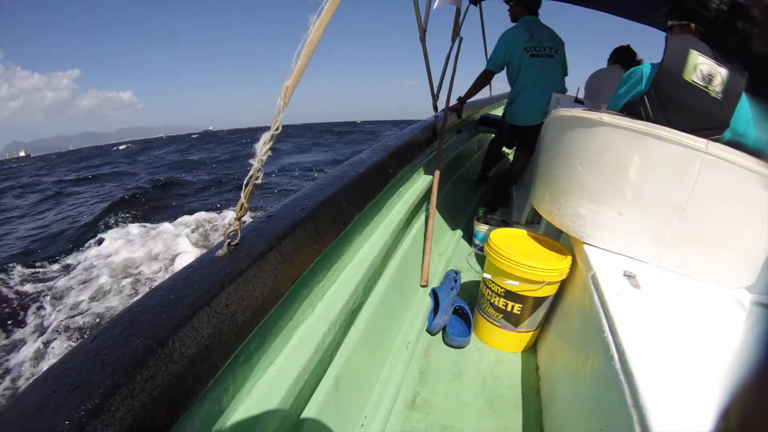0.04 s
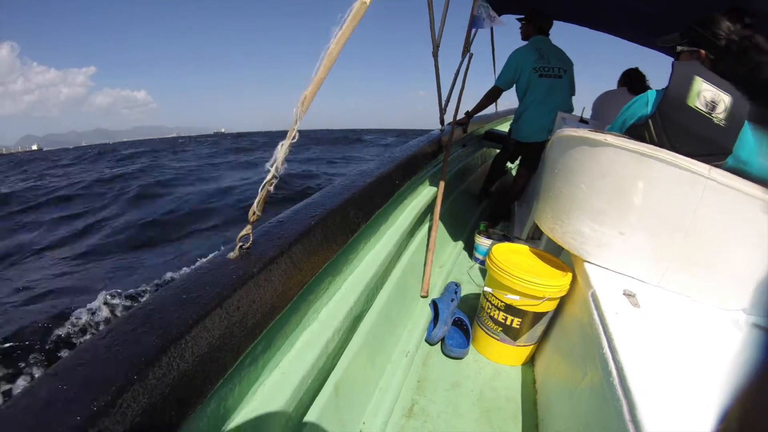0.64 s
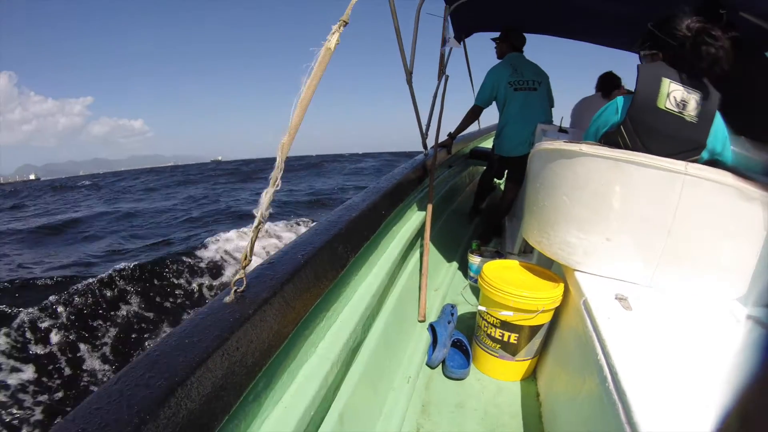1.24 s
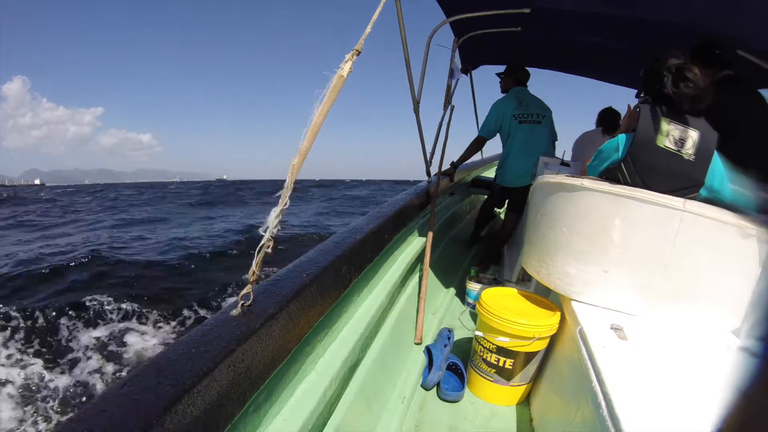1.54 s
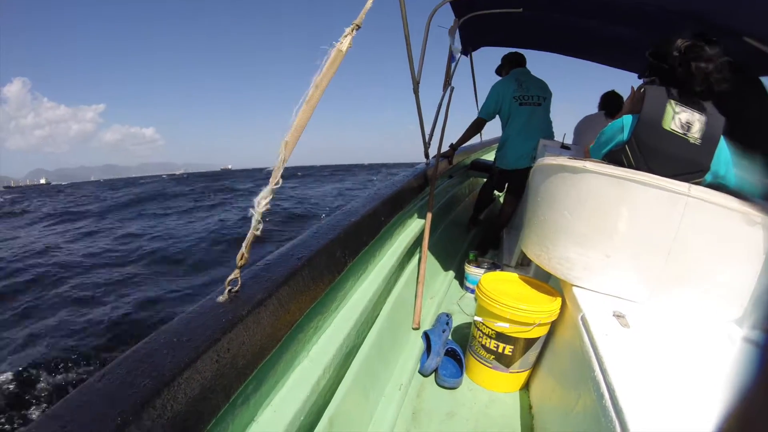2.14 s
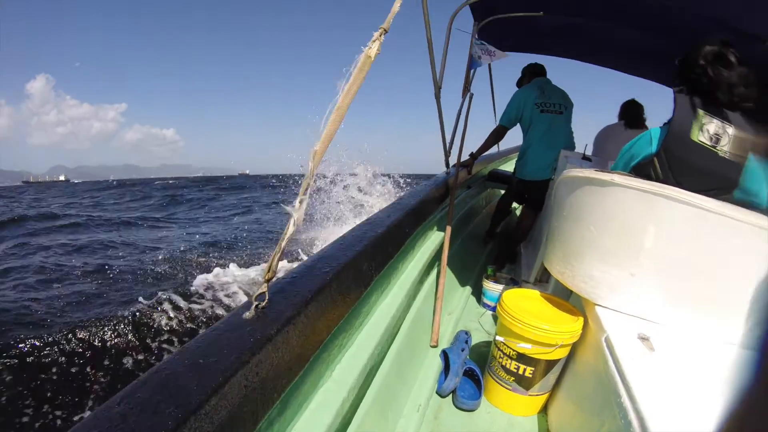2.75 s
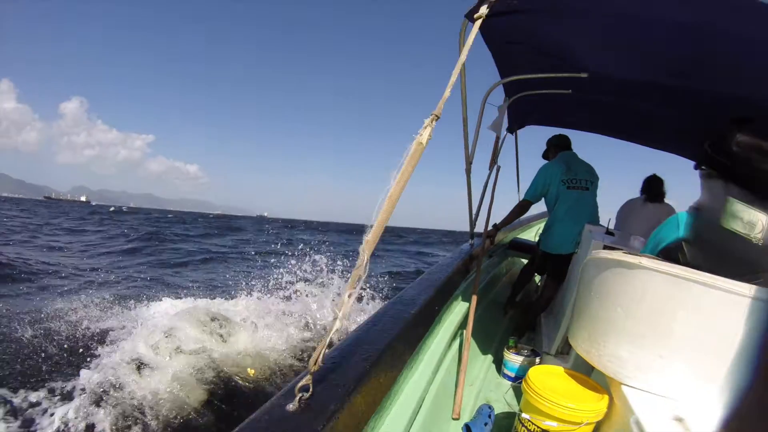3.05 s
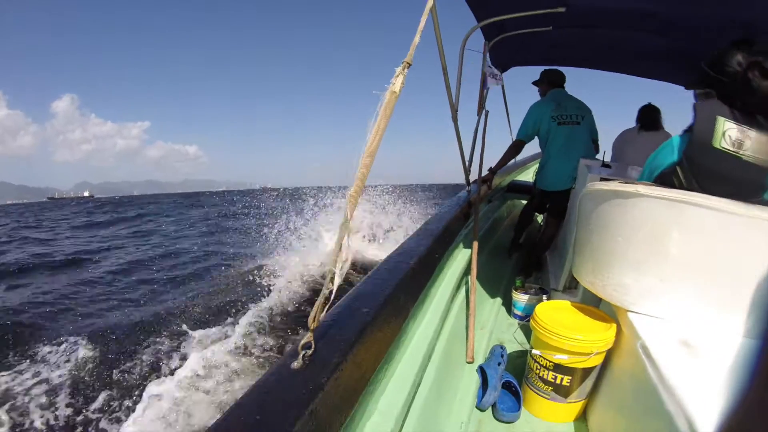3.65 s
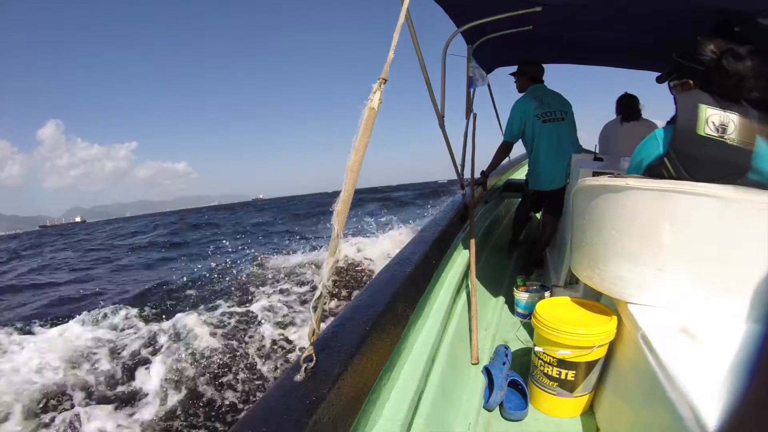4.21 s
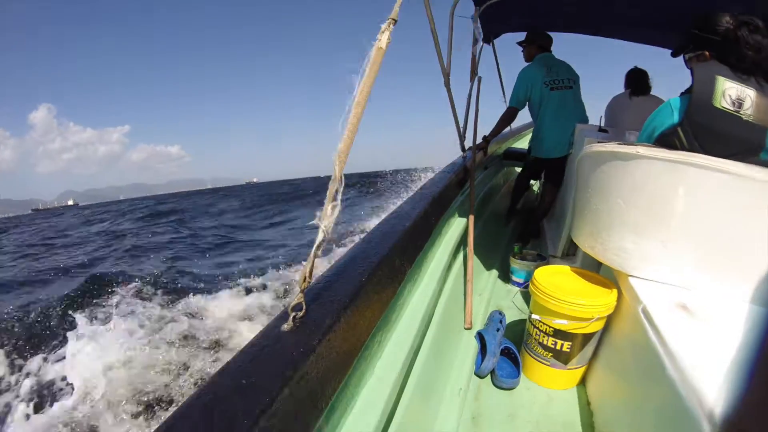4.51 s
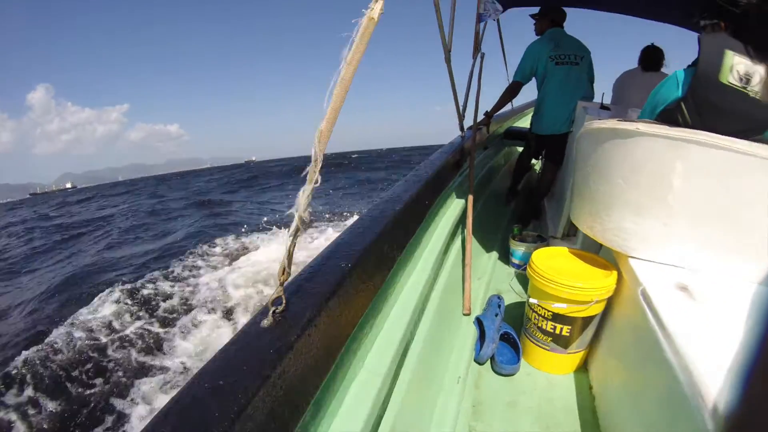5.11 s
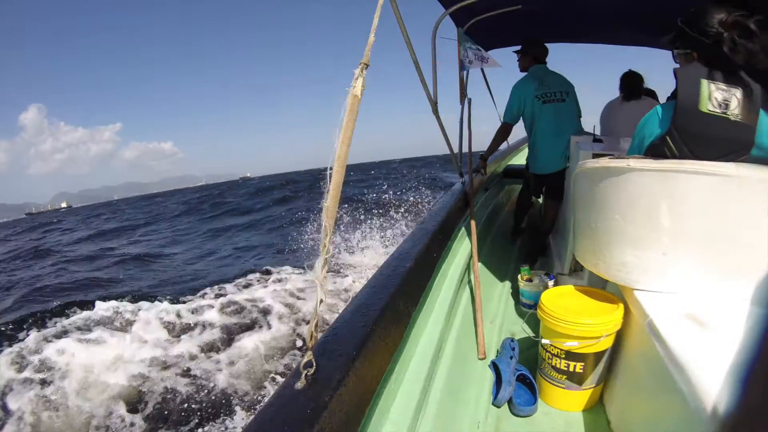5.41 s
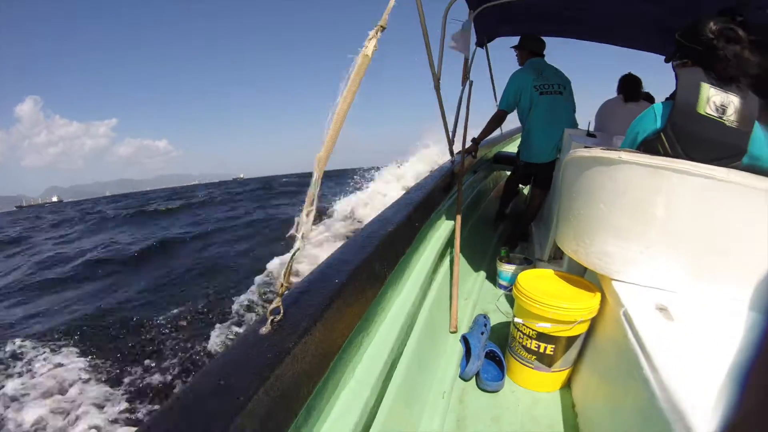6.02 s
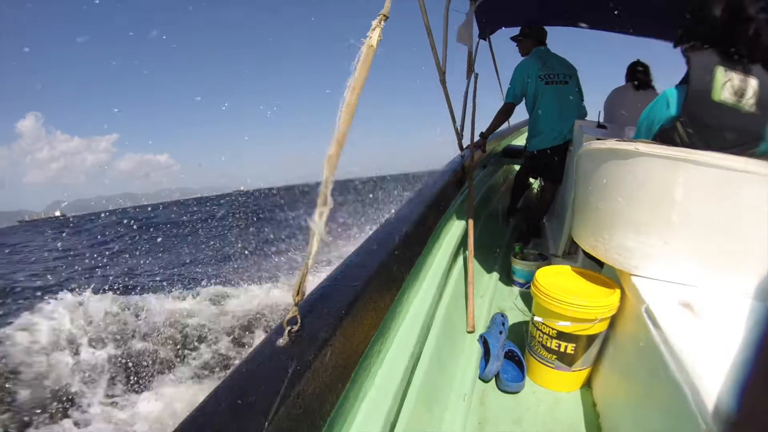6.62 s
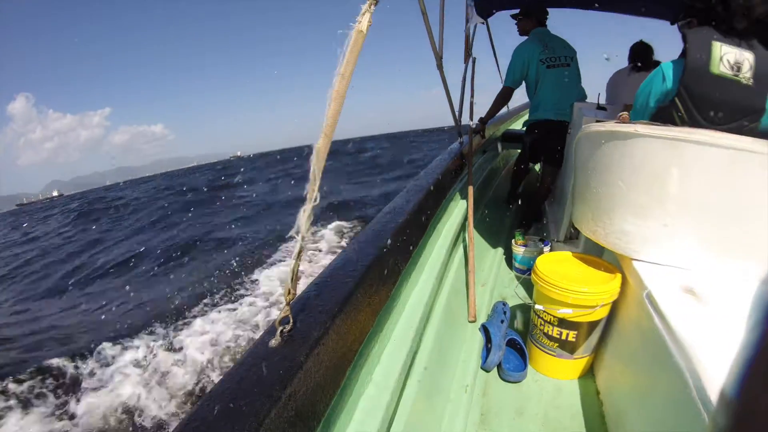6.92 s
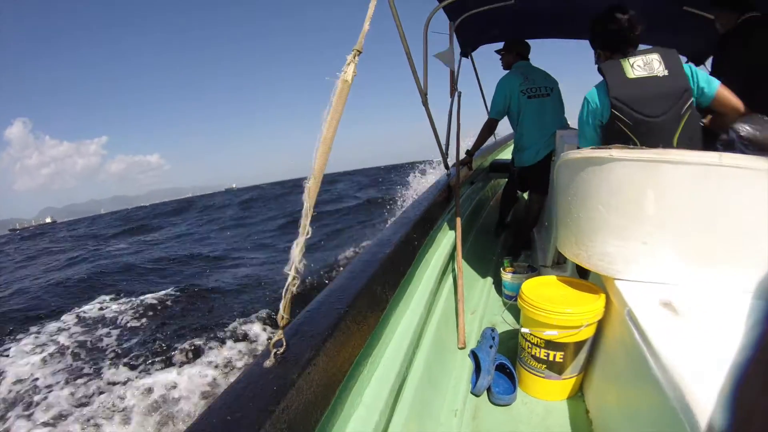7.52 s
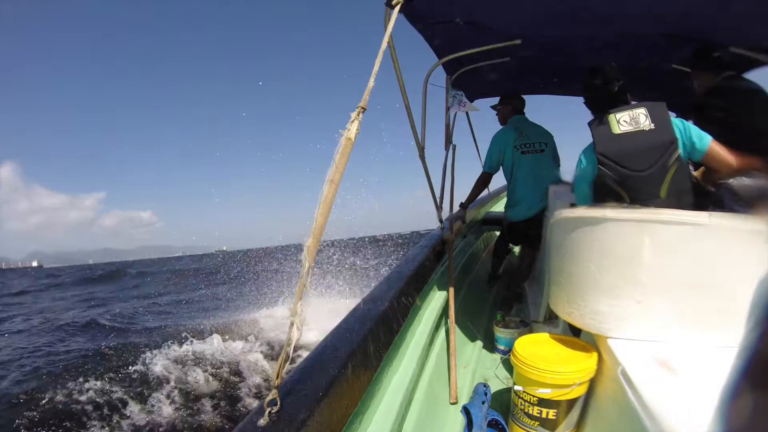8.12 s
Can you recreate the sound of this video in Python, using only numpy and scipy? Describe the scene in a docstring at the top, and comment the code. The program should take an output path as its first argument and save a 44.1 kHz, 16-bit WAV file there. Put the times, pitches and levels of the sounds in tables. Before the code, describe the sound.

An outboard motor drones steadily, wavering a little, as an open boat pushes through choppy sea. Water rushes and fizzes off the bow in repeated surges, waves drum and thump on the hull, and wind rumbles low. Late on, spray hits the waterproof camera housing near the boat's edge in a bunch of loud, sharp cracks, followed by a lighter patter at the very end.

```python
"""A four-stroke outboard motor drones as it pushes an open boat through choppy sea.
Its firing cylinders make the note, which sags as the hull meets waves. Water rushes and fizzes off
the bow, the chop drums on the hull, and wind rumbles. All is heard from a camera in a waterproof
housing near the boat's edge. Late on, spray comes aboard twice and drops crack on the housing itself."""
import sys
import numpy as np
from scipy import signal
from scipy.fft import rfft, irfft
from scipy.io import wavfile

SR = 44100
rng = np.random.default_rng(int(sys.argv[2]) if len(sys.argv) > 2 else 0)


def materialize(psi):
    """Save the field psi as 16-bit PCM at rate SR to the path in sys.argv[1].

    A 1-D psi becomes a single channel; in a 2-D psi each row is a channel.
    """
    bounded = np.clip(np.atleast_2d(psi).T, -1, 1)
    quanta = np.round(bounded * 32767).astype(np.int16)
    wavfile.write(sys.argv[1], SR, quanta)


N = 368676
TIME = np.arange(N) / SR


def gain(db):
    """Turn decibels into a number to multiply by."""
    return 10 ** (np.asarray(db) / 20)


def unit(x):
    """Scale a signal so that its average strength (rms) is 1."""
    return x / np.sqrt(np.mean(x ** 2))


def curve(table):
    """Join rows of (time, value) with straight lines."""
    return np.interp(TIME, *np.transpose(table))


def swells(table, column=2):
    """Smooth rises and dips in dB; each row begins with its middle and half its length in seconds."""
    return sum(row[column] * np.exp(-((TIME - row[0]) / row[1]) ** 2) for row in table)


def burst(start, rise):
    """A loudness shape that peaks at 1, rise seconds after the start, then dies away."""
    age = np.maximum(TIME - start, 0) / rise
    return age * np.exp(1 - age)


def surge(crest, rise, fall_s):
    """A loudness shape that climbs smoothly to 1 at the crest, then falls to 37% in fall_s."""
    climb = np.clip(1 + (TIME - crest) / rise, 0, 1)
    return np.sin(np.pi / 2 * climb) ** 2 * np.exp(-np.maximum(TIME - crest, 0) / fall_s)


def wander(rate):
    """A smooth random wobble of strength 1 that changes about rate times a second."""
    hz = np.arange(N // 2 + 1) * SR / N
    return unit(irfft(rfft(rng.standard_normal(N)) / (1 + (hz / rate) ** 2), N))


def patter(per_second, spread_db):
    """Tiny hits at random times, many small and a few large."""
    sizes = gain(spread_db * np.minimum(rng.exponential(size=N), 5))
    hits = rng.random(N) < per_second / SR
    return unit(hits * sizes * rng.choice([-1, 1], N))


# Pitches the housing boosts or weakens. Each row: pitch in Hz, width in Hz, boost in dB.
HOUSING_TONE = [(1550, 70, 3), (1800, 66, 2), (1870, 40, -4.5), (2190, 350, 5.5), (2730, 890, 5),
                (3220, 120, -4.5), (3490, 240, 4), (5305, 540, 6), (5893, 730, 10.5), (6430, 300, -3.5),
                (7020, 330, 3), (8930, 550, 3.5), (10600, 560, 4), (14800, 1500, -3.5)]

def colour(x, tone):
    """Shape a noise with rows of (Hz, dB) and with the housing's own tone; the result has strength 1."""
    hz = np.arange(1, N // 2 + 2) * SR / N
    tone_hz, tone_db = np.transpose(tone)
    db = np.interp(np.log(hz), np.log(tone_hz), tone_db)
    housing_db = sum(boost / (1 + (2 * (hz - centre) / width) ** 2) for centre, width, boost in HOUSING_TONE)
    return unit(irfft(rfft(x) * gain(db + housing_db), N))


# How fast the engine runs. Each row: time in seconds, engine cycles per second.
ENGINE_SPEED = [(0.0, 40.7), (0.54, 40.52), (0.67, 41.09), (1.37, 41.32), (2.05, 40.21), (2.4, 40.83),
                (3.73, 41.05), (3.96, 40.43), (4.21, 41.35), (5.21, 40.03), (5.45, 40.75), (5.54, 40.05),
                (5.91, 41.03), (6.66, 38.96), (7.47, 41.24), (7.77, 40.52), (7.99, 39.3), (8.36, 39.4)]
# The tones of the drone. Each row: multiple of the engine speed, level in dB.
# Tones 4 (the firing note) and 8 (its octave) get their levels in the function instead.
DRONE_TONES = [(1, -7.5), (2, -9), (3, -10), (4, 0), (5, -14), (6, -5.5), (7, -10), (8, -1.5), (9, -12.5),
               (10, -9), (11, -22), (12, -29.5), (13, -19), (14, -14.5), (15, -27.5), (16, -22),
               (17, -15.5), (18, -21.5), (19, -25), (20, -25), (21, -19), (22, -31), (23, -28), (24, -24),
               (25, -31.5), (26, -22.5)]
# The whine of the gears. Each row: multiple of the engine speed, level in dB.
GEAR_TONES = [(39, -11), (40, -19), (43, -14.5), (50, -16.5), (53, -18), (55, -16)]
# The back of the boat bobs: down, water muffles the exhaust; up, the firing note opens. Each row:
# middle in seconds, half length in seconds, change of the firing note in dB, change of its octave in dB.
STERN_BOBS = [(.25, 0.21, -10, 0.5), (.67, .16, 6.5, -1), (2.13, 0.14, -12, 0.5), (2.9, 0.079, 3.5, 1),
              (3.83, .14, -4, -0.5), (4.2, .1, 3, -0.5), (5.45, 0.056, 4, 1.5), (5.69, .1, -12, -1),
              (6.48, 0.16, -2, -9), (6.6, .09, 7, 2), (7.03, .11, -12, 2.5), (7.32, 0.099, 4, -1)]
# The tone of the valve clatter. Each row: pitch in Hz, level in dB.
CLATTER_TONE = [(400, -6), (650, -2), (1000, -9), (1600, -3.5), (2400, -6), (3400, -15.5), (5000, -25),
                (12000, -39)]

def outboard(cruise_hz=40.6, drone_db=-46, whine_db=-46.5, clatter_db=-48, waver_db=1.77, throb=0.28):
    """Four cylinders fire in each cycle; the gears whine and the valves clatter in step with them."""
    speed = curve(ENGINE_SPEED)
    phase = 2 * np.pi * np.cumsum(speed * (1 + 0.0015 * wander(12.3))) / SR
    # The firing note grows with speed; its octave sinks when the engine struggles.
    extra_hz = speed - cruise_hz
    firing_db = -45 + 1.3 * extra_hz + swells(STERN_BOBS)
    octave_db = -44 + 2.5 * np.minimum(extra_hz, 0) + swells(STERN_BOBS, column=3)
    exhaust_db = {4: firing_db, 8: octave_db}
    drone = 0
    for tones, base_db in (DRONE_TONES, drone_db), (GEAR_TONES, whine_db):
        for multiple, db in tones:
            level_db = exhaust_db.get(multiple, base_db + db + waver_db * wander(1.8))
            tone = np.sqrt(2) * np.sin(multiple * phase + rng.uniform(0, 2 * np.pi))
            drone += gain(level_db) * tone
    strokes = (1 + throb * np.cos(phase)) * (1 + 0.19 * np.cos(4 * phase))
    clatter = colour(strokes * rng.standard_normal(N), CLATTER_TONE)
    return drone + gain(clatter_db) * clatter


# The steady rush of water along the side. Each row: time in seconds, level in dB.
SIDE_RUSH = [(0, -45.5), (1.6, -48), (2.7, -47), (4.5, -44.5), (7.4, -44), (8.36, -43.5)]
# Waves the bow throws aside. Each row: peak time in seconds, rise in seconds, wash in dB, fizz in dB.
BOW_WAVES = [(.22, 0.17, -45.5, -60), (1.02, 0.19, -48, -58), (1.75, .12, -46, -54),
             (2.35, 0.22, -45.5, -58), (2.97, 0.26, -41, -49.5), (3.17, 0.2, -41.5, -46.5),
             (3.48, .12, -44.5, -51.5), (3.82, 0.26, -42.5, -49.5), (4.07, 0.39, -43, -46),
             (4.78, 0.17, -44.5, -60), (5.75, 0.3, -44, -46.5), (6.15, 0.17, -47, -54.5),
             (6.7, 0.23, -39, -43.5), (6.87, 0.14, -66, -54), (7.3, 0.15, -46, -57), (8.0, .2, -48, -50.5),
             (8.3, 0.35, -50, -48)]
# Small waves slap the side. Each row: start in seconds, rise in seconds, wash in dB, fizz in dB.
SIDE_SLAPS = [(.155, .045, -52, -68), (1.338, 0.0085, -47, -55), (2.499, 0.0051, -49, -67),
              (2.522, 0.0085, -45, -53), (2.655, 0.0062, -52, -70), (5.272, 0.0034, -45, -63),
              (5.325, 0.012, -46.5, -75)]
# The tones of the rushing wash and the brighter fizz. Each row: pitch in Hz, level in dB.
WASH_TONE = [(300, -6), (600, -8.5), (1000, -7.5), (1400, -4), (2300, -1.5), (3000, -6), (4000, -9),
             (4700, -20), (7000, -21), (15000, -41.5)]
FIZZ_TONE = [(1000, -34), (2500, -6.5), (3800, 2.5), (4700, -3.5), (6500, 1), (9000, -8), (12000, -18.5),
             (15500, -18)]

def bow_wash(steady_fizz_db=-14, wave_fizz_db=-1, churn_db=0.72):
    """Torn water rushes, surges and slaps along the side; its spray falls back as a fizz of droplets."""
    wash_level = gain(curve(SIDE_RUSH))
    fizz_level = wash_level * gain(steady_fizz_db)
    for crest, rise, wash_db, fizz_db in BOW_WAVES:
        wash_level = np.hypot(wash_level, gain(wash_db) * surge(crest, rise, fall_s=0.27))
        fizz_level = np.hypot(fizz_level, gain(fizz_db + wave_fizz_db) * surge(crest, rise, fall_s=0.32))
    for start, rise, wash_db, fizz_db in SIDE_SLAPS:
        slap = burst(start, rise)
        wash_level += gain(wash_db) * slap
        fizz_level += gain(fizz_db) * slap
    wash = wash_level * colour(patter(per_second=9000, spread_db=2.2), WASH_TONE)
    fizz = fizz_level * colour(patter(per_second=9000, spread_db=2.5), FIZZ_TONE)
    return (wash + fizz) * gain(churn_db * wander(31))


# The bow comes down on a wave. Each row: start in seconds, ring in dB, rumble in dB.
HULL_THUMPS = [(1.13, -37, -49), (1.98, -46, -46), (2.325, -35, -58), (2.521, -36, -48), (3.12, -34, -49),
               (3.43, -35, -48), (3.87, -50, -49), (5.441, -39, -54), (5.6, -41, -51), (6.53, -46, -43),
               (6.885, -31, -62), (7.86, -46, -48)]
# The low notes the hull rings with. Each row: pitch in Hz, seconds to fade by 60 dB, level in dB.
HULL_NOTES = [(52, 0.084, -4), (85.5, 0.13, 3.5), (121, 0.09, 6.5)]
# The tone of the drumming on the hull. Each row: pitch in Hz, level in dB.
HULL_TONE = [(40, -4.5), (80, 1.5), (130, 1), (210, 2.5), (350, -2), (470, -9), (800, -30), (2000, -49)]

def hull(drumming_db=-47.5, uneven_db=1.2, rumble_rise_s=0.02):
    """Small waves drum unevenly on the open hull; bigger ones thump it, so it rings and rumbles."""
    drum_level = gain(drumming_db + uneven_db * wander(3.5))
    rings = 0
    for start, ring_db, rumble_db in HULL_THUMPS:
        drum_level += gain(rumble_db) * burst(start, rumble_rise_s)
        age = np.maximum(TIME - start, 0)
        for hz, fade_s, db in HULL_NOTES:
            rings += gain(ring_db + db - 60 * age / fade_s) * np.sin(2 * np.pi * hz * age) / 2
    return drum_level * colour(patter(per_second=900, spread_db=1.96), HULL_TONE) + rings


# Gusts that catch the housing. Each row: middle in seconds, half length in seconds, boost in dB.
WIND_GUSTS = [(.3, 0.078, 10.5), (1.46, .05, 3), (1.68, .04, 5), (3.44, 0.042, 11.5), (6.7, 0.14, 6),
              (7.27, .05, 4.5)]
# The deep tone of the wind. Each row: pitch in Hz, level in dB.
WIND_TONE = [(8, -3), (22, 4), (36, -5.5), (60, -10), (110, -26), (300, -24), (1000, -59.5)]

def wind(level_db=-43.5, buffet_db=1.3):
    """A steady head wind with a few gusts; swirls of air buffet the housing."""
    rumble = colour(rng.standard_normal(N), WIND_TONE)
    return rumble * gain(level_db + swells(WIND_GUSTS) + buffet_db * wander(19))


# The notes of the housing when hit. Each row: pitch in Hz, seconds to fade by 60 dB, level in dB.
HOUSING_NOTES = [(1281, 0.0052, -24), (1545, 0.013, 0), (1884, 0.0071, 2.5), (2150, 0.011, 2),
                 (2760, 0.0059, 4.5), (3290, 0.015, 1.5), (3620, 0.021, -6), (5250, 0.0078, -4),
                 (5940, 0.0033, 2), (7700, 0.0019, -2), (11200, 0.002, -9)]

def drop_crack(ring_hz, snap_db, favour_db=11, hardness=0.59, knock_db=-17, knock_hz=650, split_hz=4100):
    """One drop rings the housing; where it lands favours notes near ring_hz, and a hard hit adds a snap."""
    t = np.arange(2048) / SR
    body = np.zeros_like(t)
    snap = rng.standard_normal(len(t)) * np.exp(-t / 0.0015)  # the drop bursts
    for hz, fade_s, db in HOUSING_NOTES:
        octaves = np.log2(hz / ring_hz)
        boost_db = favour_db * np.exp(-(octaves / 0.25) ** 2)
        tilt_db = hardness * (snap_db + 18.5) * np.clip(octaves, -1, 1)  # a quick hit rings higher notes
        detuned_hz = hz * (1 + 0.015 * rng.standard_normal())
        note = gain(db + boost_db + tilt_db - 60 * t / fade_s) * np.cos(2 * np.pi * detuned_hz * t)
        if hz < split_hz:
            body += note
        else:
            snap += note
    body_band_hz = [np.clip(0.57 * ring_hz, 600, 1600), np.clip(1.68 * ring_hz, 3000, split_hz)]
    body = signal.sosfilt(signal.butter(3, body_band_hz, "bandpass", fs=SR, output="sos"), body)
    snap = signal.sosfilt(signal.butter(2, [split_hz, 11000], "bandpass", fs=SR, output="sos"), snap)
    # Heavy drops favour the lowest notes and knock the whole housing as well.
    weight = (1500 / ring_hz) ** 3.8
    knock = np.sin(2 * np.pi * knock_hz * t) * np.exp(-t / 0.0013)
    crack = unit(body) + gain(snap_db) * unit(snap) + gain(knock_db) * weight * unit(knock)
    return crack / np.std(crack[t < 0.004])


# The larger drops. Each row: start in seconds, level of the first 4 milliseconds in dB,
# favoured pitch in Hz, snap in dB compared with the ring.
BIG_DROPS = [(4.203, -34.5, 2200, -16), (6.5375, -27.5, 2117, -16), (6.545, -19.5, 2200, -17),
             (6.555, -31, 2401, -6), (6.6091, -19.5, 3020, -16), (6.6142, -27, 3530, 11),
             (6.6205, -32, 3010, -4), (6.6244, -35, 2150, -8), (6.6485, -27, 2460, 3),
             (6.6576, -26.5, 2240, -12), (6.6765, -23.5, 2130, -1), (6.704, -31, 2900, -5),
             (6.7099, -18, 1480, -17), (6.7163, -30, 1880, -7), (6.72, -29.5, 1980, 1),
             (6.7676, -31, 2200, 4), (6.7875, -28.5, 2050, -11), (6.8335, -26.5, 1520, -15),
             (6.8671, -29.5, 1410, -11), (7.1036, -21, 3030, -14.5), (7.127, -12.5, 2244, -2.5),
             (7.1483, -16.5, 1800, -16.5), (8.1877, -29.5, 3360, 2), (8.208, -33, 3350, 6),
             (8.2443, -32, 2383, -13), (8.2838, -37, 2150, -16), (8.3351, -38, 3296, 14)]

def drops():
    """One stray drop hits the housing, and later two bunches of them as spray comes aboard."""
    out = np.zeros(N)
    for start, level_db, ring_hz, snap_db in BIG_DROPS:
        first = int(start * SR)
        crack = drop_crack(ring_hz, snap_db)[:N - first]
        out[first:first + len(crack)] += gain(level_db) * crack
    return out


# Showers of fine droplets. Each row: start in seconds, rise in seconds, level in dB.
FINE_SHOWERS = [(6.523, 0.013, -36), (6.575, 0.0045, -34), (6.595, 0.015, -30), (6.69, 0.045, -46),
                (8.19, 0.029, -35)]
# The tone of the showers. Each row: pitch in Hz, level in dB.
SHOWER_TONE = [(600, -21), (1000, -10), (1400, 5), (2200, 2.5), (4000, -4), (6000, -9), (10000, -9),
               (15000, -19)]

def showers():
    """Each cloud of fine droplets reaches the housing quickly, patters on it and thins out."""
    level = sum(gain(db) * burst(start, rise) for start, rise, db in FINE_SHOWERS)
    return level * colour(patter(per_second=3600, spread_db=3.6), SHOWER_TONE)


def scene():
    """Engine, water, wind and drops, added up at one microphone."""
    return (outboard() + bow_wash() + hull() + wind() + drops() + showers())[None]


def record(dry, top_hz=15300):
    """The camera rounds off the hardest peaks and cuts the treble above top_hz."""
    rounded = dry / (1 + dry ** 6) ** (1 / 6)
    return signal.sosfilt(signal.ellip(10, 0.2, 70, top_hz, fs=SR, output="sos"), rounded)


dry = scene()
out = record(dry)
materialize(out)
```